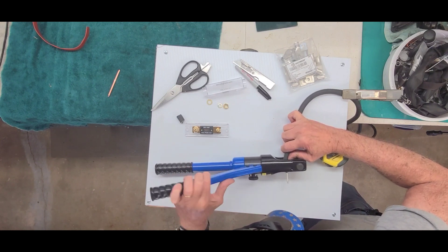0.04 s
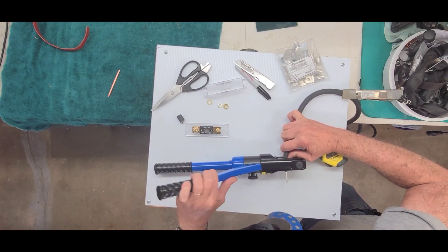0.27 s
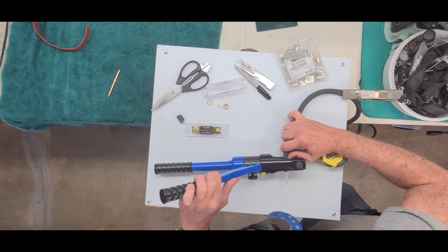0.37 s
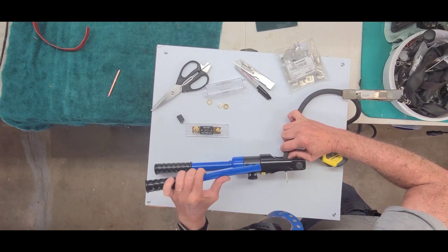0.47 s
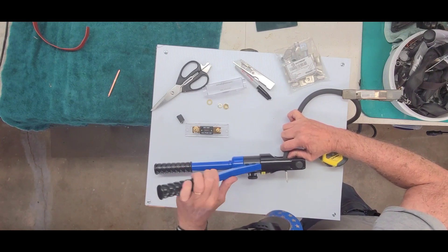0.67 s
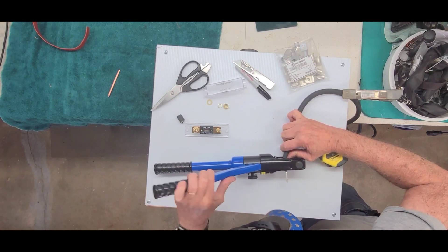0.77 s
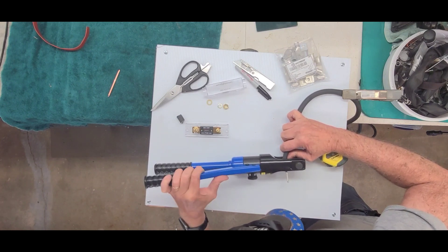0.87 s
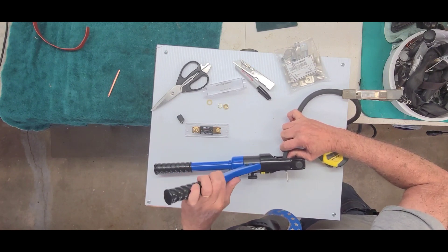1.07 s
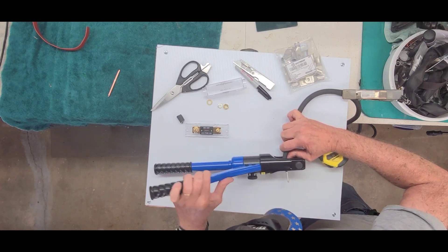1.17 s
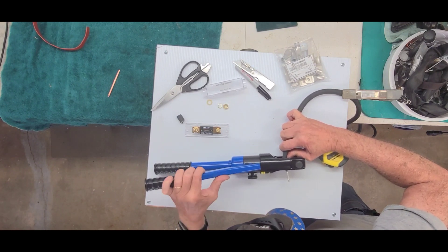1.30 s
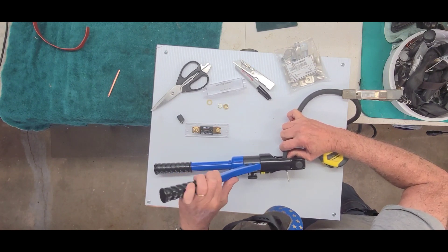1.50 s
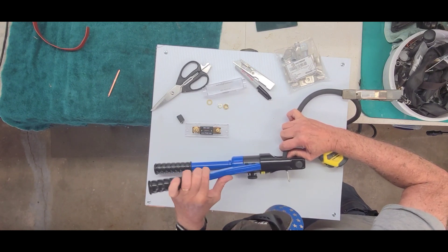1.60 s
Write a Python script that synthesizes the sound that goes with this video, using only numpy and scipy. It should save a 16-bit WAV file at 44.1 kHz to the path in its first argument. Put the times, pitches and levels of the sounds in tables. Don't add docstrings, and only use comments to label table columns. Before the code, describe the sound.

A hand-pumped hydraulic crimper clicks, rattles and knocks on a bench with each handle stroke

```python
import sys
import numpy as np
from scipy import signal
from scipy.fft import rfft, irfft
from scipy.io import wavfile
from scipy.ndimage import uniform_filter1d

SR = 44100
rng = np.random.default_rng(int(sys.argv[2]) if len(sys.argv) > 2 else 0)


def voltage_ratio(decibels):
    exponent = np.asarray(decibels, float) / 20
    return 10 ** exponent


def dump_mix(stems):
    frames = np.atleast_2d(stems).T
    limited = np.clip(frames, -1, 1)
    pcm = np.round(limited * 32767).astype(np.int16)
    wavfile.write(sys.argv[1], SR, pcm)


N = 72765
T = np.arange(N) / SR

# time_s, click_db, ping_db, scrape_s, bite_db
HANDLE_STOPS = [
    (0.178, -37, -38, 0.0083, 3),
    (0.568, -35.5, -24, 0.0088, 6.5),
    (0.8244, -39, -45, 0.0057, 3.5),
    (0.9448, -37.5, -17, 0.015, 4.5),
    (1.3097, -38, -32, 0.015, 0),
]
# start_s, level_db, swell_s, fall_s, squeal_db
SQUEEZES = [
    (-.02, -47.5, 0.031, 0.033, -25),
    (0.325, -45, 0.037, 0.043, -23),
    (0.724, -43, 0.021, 0.042, -22),
    (1.077, -35.5, 0.033, 0.03, -16.5),
    (1.468, -58, 0.025, 0.068, -37),
]
# peak_s, level_db, rise_s, fall_s
ROCKING = [(0.016, -49.5, 0.054, 0.059), (0.346, -44.5, 0.025, 0.049), (0.749, -46, 0.031, 0.044),
           (1.084, -35, 0.031, 0.035), (1.504, -51, 0.027, 0.015)]
# time_s, deep_boom_db, boom_db, panel_db, top_db
THUDS = [(.002, -38, -36, -51, -51.5), (.05, -52, -67, -52.5, -62), (0.131, -45, -57, -70, -75),
         (0.086, -54, -46.5, -75, -62), (0.189, -32.5, -31, -43, -43), (0.218, -70, -33, -66, -54),
         (.305, -25, -45, -44.5, -46), (0.346, -51, -34, -48, -48.5), (0.441, -34.5, -50, -55, -63),
         (0.576, -30.5, -31, -36.5, -44), (.61, -35, -42.5, -66, -54), (0.694, -31.5, -29.5, -51.5, -52),
         (.74, -34.5, -40, -49, -42), (0.791, -43, -40.5, -54, -63), (.95, -30.5, -29, -33, -41.5),
         (0.992, -58, -37.5, -44, -61), (1.044, -22, -53, -40.5, -51), (1.065, -35, -24.5, -55, -46),
         (1.084, -30.5, -30.5, -38.5, -41.5), (1.139, -41, -61, -54, -59), (1.237, -42.5, -58, -62, -76),
         (1.316, -31.5, -30.5, -36.5, -38), (1.421, -35.5, -57, -66, -79), (1.471, -46.5, -57, -51.5, -72),
         (1.51, -62, -72, -60, -53)]
# time_s, level_db, colour_hz, length_s
TICKS = [(0.071, -38, 2970, 0.016), (0.316, -47, 1380, 0.004), (0.323, -43, 1370, 0.0084),
         (0.415, -40, 2790, 0.0086), (0.466, -45, 1550, 0.0051), (0.547, -54, 1520, 0.0031),
         (0.68, -50.5, 2820, 0.01), (0.688, -49.5, 2930, 0.009), (0.706, -45, 1400, 0.0097),
         (0.724, -39, 1410, 0.013), (.864, -38.5, 1510, 0.0011), (1.061, -34, 1360, 0.015),
         (1.156, -47, 1510, 0.0039), (1.189, -39.5, 1450, 0.0027), (1.358, -44, 1470, 0.0065),
         (1.441, -56, 1415, 0.0041), (1.476, -51, 3500, 0.0074), (1.498, -41, 1530, 0.011),
         (1.585, -44.5, 1520, 0.0033)]
# time_s, level_db, colour_hz
CLATTER = [(0.1771, -32, 2780), (.1818, -32.5, 2660), (0.187, -50, 2730), (0.2142, -46, 1490),
           (.288, -41.5, 4040), (0.2925, -35.5, 2850), (.299, -54, 2700), (0.3357, -52, 6260),
           (0.3509, -27.5, 2780), (0.352, -28, 1380), (.356, -32, 2570), (0.3613, -36.5, 1510),
           (0.3666, -38, 2930), (0.3662, -32, 1450), (0.373, -43, 1530), (0.3795, -41, 1440),
           (.404, -46, 2930), (.437, -63, 2700), (0.5765, -42, 2580), (0.74, -48, 2800), (.7405, -36, 1420),
           (0.744, -30, 2710), (0.7487, -28.5, 1355), (.7525, -41, 2660), (.755, -36, 1460),
           (0.7584, -30, 2720), (0.765, -34, 1564), (0.763, -53, 2830), (.772, -60, 1530),
           (.783, -45, 6150), (0.8435, -40, 2670), (0.9489, -30, 2640), (0.954, -35.5, 2370),
           (0.965, -53, 1230), (1.0365, -32.5, 2840), (1.0429, -38, 2870), (1.0635, -43, 1410),
           (1.072, -25.5, 1430), (1.078, -45, 1440), (1.0823, -28, 3240), (1.087, -30.5, 5900),
           (1.0865, -39, 2920), (1.0883, -36, 1360), (1.0945, -31, 2900), (1.101, -36.5, 1160),
           (1.102, -28.5, 2730), (1.1069, -44, 3000), (1.1077, -28.5, 1520), (1.1144, -27.5, 3840),
           (1.119, -53, 3000), (1.126, -39, 2820), (1.127, -36, 1330), (1.1659, -40.5, 1400),
           (1.3059, -41.5, 2670), (1.3099, -36, 2490), (1.3165, -26, 2800), (1.476, -52, 5900),
           (1.481, -52, 1430), (1.492, -42, 1520), (1.509, -31, 2576)]

# pitch_hz, level_db, t60_s
TOOL_MODES = [(1056.4, -1, 0.089), (1195, -9, 0.072), (1367, 4.5, 0.037), (1416, 4, 0.12), (1582, 6, 0.014),
              (2297, -2.5, 0.049), (2537, 1.5, 0.061), (2970, 7, 0.0096), (3503, -4, 0.11),
              (3860, -43, 0.06), (5230, -45, 0.06), (6100, -3, 0.028), (9054, -20, 0.036),
              (10850, -14, 0.0025)]
# pitch_hz, level_db, t60_s
SQUEAL_MODES = [(12756, 1, .05), (12950, -5, .012), (14920, 4, .03), (14700, 2, .012)]
# pitch_hz, level_db, t60_s
PIVOT_MODES = [(2600, -9, .005), (4000, -10, .003)]
# pitch_hz, level_db, t60_s, lag_s
DEEP_MODES = [(70.6, 0.7, 0.33, -0.0055)]
BOOM_MODES = [(90.64, 4.5, 0.17, -.002), (155.1, -21, 0.57, 0.0024)]
PANEL_MODES = [(255.2, 6.5, 0.074, 0.01237), (282.1, -9.5, 0.37, 0.02)]
TOP_MODES = [(355, -15, 0.16, 0.0022), (401.2, 3, 0.1, 0.0021), (481.8, 5.5, 0.08, .001),
             (564.4, -3.5, 0.091, 0.00194)]

# pitch_hz, level_db
CRACK_COLOUR = [(600, -6), (1300, -34), (2500, -26), (4500, 7), (7000, -6.5), (8200, -14.5), (12000, -17.5),
                (16000, -17)]
# pitch_hz, level_db
SCRAPE_COLOUR = [(700, -37), (1400, 4), (1950, 0.5), (3300, 2.5), (6300, 0), (7800, -11.5), (11500, -26.5),
                 (16000, -52)]
# pitch_hz, level_db
ROCK_COLOUR = [(120, 10.5), (180, -3.5), (270, 1.5), (520, 0), (800, -21), (1400, -6), (1900, -19),
               (7000, 9.5)]
# pitch_hz, density_db
FLOOR_COLOUR = [(25, -10.5), (50, -8), (80, 2.5), (180, -15), (470, -21), (800, -29.5), (2600, -83),
                (7500, -62.5)]
# pitch_hz, side_db
WIDTH = [(100, -16), (350, -5.5), (750, 3.5), (1400, -7), (2600, 0), (16000, -0.5)]
# pitch_hz, level_db
TREBLE_SHAPE = [(7000, -2.5), (7900, -4.5), (9900, 7.5), (11200, 2), (12900, 8.5), (13900, -6), (14900, 7),
                (15800, -17)]

LEFT_RIGHT = np.array([[1], [-1]])


def knocks():
    rise_s, ping_hz, ping_t60_s, ring_db = 0.0007, 5940, 0.0034, -2.5
    rub, strike = rng.standard_normal((2, N))
    scrape, bite, slide, snap = 0, 0, 0, 0
    for s, click_db, ping_db, fall, bite_db in HANDLE_STOPS:
        scrape = scrape + voltage_ratio(click_db) * burst(s, rise_s, fall)
        bite = bite + voltage_ratio(click_db + bite_db) * burst(s, rise_s / 4, 0.51 * fall)
        slide = slide + voltage_ratio(click_db - 5.5) * burst(s - 0.002, 0.005, 0.0071)
        snap = snap + voltage_ratio(ping_db - 10) * burst(s, 0.0001, 0.0016)
    force = rub * scrape
    lead_in = rub * slide
    ping = mode(strike * snap, ping_hz * 1.07, ping_t60_s / 2)
    ping = mode(ping, ping_hz * 0.942, ping_t60_s / 2) * voltage_ratio(-15)
    pivot = sum(voltage_ratio(db) * unit(mode(force + lead_in, hz, t60)) for hz, db, t60 in PIVOT_MODES)
    ringing = voltage_ratio(ring_db) * steel(force, TOOL_MODES)
    return colour(rub * bite, CRACK_COLOUR) + ringing + pivot * force.std() + ping


def squeezes():
    shaking, jetting = 0, 0
    for s, db, rise, fall, squeal_db in SQUEEZES:
        shaking = shaking + voltage_ratio(db) * swell(s, rise, fall)
        jetting = jetting + voltage_ratio(db + squeal_db) * swell(s, rise, 0.45 * fall)
    force = grains(5000) * judder() * shaking
    jet = grains(3700) * jetting
    rocking = sum(voltage_ratio(db + 18.5) * burst(s, rise, fall) for s, db, rise, fall in ROCKING)
    soft_contacts = signal.lfilter(*signal.butter(4, 2200, fs=SR), grains(1500) * 1.0)
    rattle = voltage_ratio(-1) * steel(force, TOOL_MODES) + colour(force, SCRAPE_COLOUR)
    return rattle + steel(jet, SQUEAL_MODES) + colour(rocked(rocking), ROCK_COLOUR)


def rocked(rocking):
    return signal.lfilter(*signal.butter(4, 2200, fs=SR), grains(1500) * rocking)


def swell(s, rise, fall):
    start = np.clip((T - s) / 0.012, 0, 1)
    growth = voltage_ratio(-6 * (0.5 - (T - s).clip(0) / rise))
    decay = np.exp((s + rise - T).clip(None, 0) / fall)
    return start * np.where(T < s + rise, growth, decay)


def judder():
    clumps_per_s, depth_db = 160, 3.5
    k = SR // clumps_per_s
    steps = np.repeat(rng.standard_normal(N // k + 1), k)
    return unit(voltage_ratio(depth_db * uniform_filter1d(steps, k // 3)[:N]))


def grains(per_s):
    when, sign, size = rng.random((3, N))
    sizes = voltage_ratio(-3.5 * np.log(1 - 0.96 * size))
    return unit((when < per_s / SR) * np.sign(sign - 0.5) * sizes)


def steel(force, modes):
    scale = np.sqrt(np.mean(force ** 2) / sum(voltage_ratio(m[1]) ** 2 for m in modes))
    ring = 0
    for i, (hz, db, t60) in enumerate(modes):
        ring = ring + (-1) ** i * voltage_ratio(db) * unit(mode(force, hz, t60))
    return scale * ring


def ticks():
    rise_s, blow_s = 0.0006, 0.0012
    out, noise, size = np.zeros(N), rng.standard_normal(N), SR // 20
    for s, db, hz, fall in TICKS + [(*row, blow_s) for row in CLATTER]:
        span = slice(int(s * SR) - size // 10, int(s * SR) + size)
        push = (noise * burst(s, min(rise_s, fall / 2), fall / 2))[span]
        out[span] += voltage_ratio(db) * tap(push, hz, cycles=12 if hz > 2000 else 11)
    return out


def tap(push, hz, cycles):
    low, high = (unit(mode(mode(push, f, cycles / f), f, cycles / f)) for f in (hz, hz * 1.454))
    both = low + voltage_ratio(-6 if 2000 < hz < 3300 else -16) * high
    return both / np.abs(both).max()


def bench():
    build_cycles, wide_db = 7.3, -15.5
    out = 0
    for column, modes in enumerate((DEEP_MODES, BOOM_MODES, PANEL_MODES, TOP_MODES)):
        for i, (hz, db, t60, lag) in enumerate(modes):
            push = 0
            for row in THUDS:
                push = push + voltage_ratio(row[column + 1] + db) * np.exp(-((T - row[0] - lag) * hz * 4) ** 2)
            build = mode(push * hz * 4 / SR, hz, build_cycles / hz) * 20 * hz / build_cycles / SR
            ring = (-1) ** (i + column) * mode(build, hz, t60)
            late = np.roll(ring, int(SR / hz / 4))
            out = out + ring + voltage_ratio(wide_db) * late * LEFT_RIGHT
    return out


def ports(x):
    diffuse = 0.9
    near = echoes(x, 0.03, 1e-4, channels=1)[0]
    side = diffuse * near + np.sqrt(1 - diffuse ** 2) * signal.hilbert(x).imag
    return x + colour(side, WIDTH) * LEFT_RIGHT


def room(x):
    tail = echoes(x, 0.32, 0.003, channels=2)
    mid, side = signal.lfilter(*signal.butter(1, 13100, fs=SR), tail)
    return voltage_ratio(-7) * (mid + colour(side, WIDTH) * LEFT_RIGHT)


def echoes(x, t60, rise, channels):
    places, place_s = 6, 0.045
    t = T[:int(SR * 0.45)]
    tail = rng.standard_normal((places, channels, len(t))) * voltage_ratio(-60 * t / t60) * np.clip(t / rise, 0, 1)
    tail = tail / np.sqrt(np.sum(tail[0, 0] ** 2))
    turn = (T / place_s - np.arange(places)[:, None]) % places
    parts = x * np.cos(np.pi / 2 * np.minimum(turn, places - turn).clip(0, 1))
    return signal.fftconvolve(parts[:, None], tail, axes=2).sum(axis=0)[:, :N]


def workshop():
    mid, side = (colour(rng.standard_normal(N), FLOOR_COLOUR) for _ in range(2))
    return voltage_ratio(-49.5) * unit(mid + colour(side, WIDTH) * LEFT_RIGHT)


def unit(x):
    return x / np.sqrt(np.mean(x ** 2))


def mode(x, hz, t60):
    r = np.exp(-np.log(1000) / (max(t60, 0.001) * SR))
    w = 2 * np.pi * hz / SR
    return signal.lfilter([0, np.sin(w)], [1, -2 * r * np.cos(w), r * r], x)


def colour(x, points):
    hz, db = np.array(points).T
    bins_hz = np.arange(N // 2 + 1) * SR / N + 1
    return irfft(rfft(x) * voltage_ratio(np.interp(np.log(bins_hz), np.log(hz), db)), N)


def burst(s, rise, fall):
    return np.exp(np.where(T < s, (T - s) / max(rise, 1e-4), (s - T) / max(fall, 1e-4)))


def scene():
    tool = knocks() + squeezes() + ticks()
    return (ports(tool) + room(tool) + bench() + workshop()) * voltage_ratio([[-0.17], [0.17]])


def roll_off(x):
    return signal.sosfilt(signal.butter(12, 15850, fs=SR, output="sos"), x)


def record(dry):
    low_cut = signal.butter(2, 46, "high", fs=SR, output="sos")
    heard = colour(signal.sosfilt(low_cut, dry), TREBLE_SHAPE)
    return roll_off(heard)


dry = scene()
out = record(dry)
dump_mix(out)
```